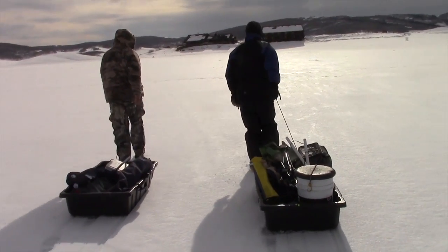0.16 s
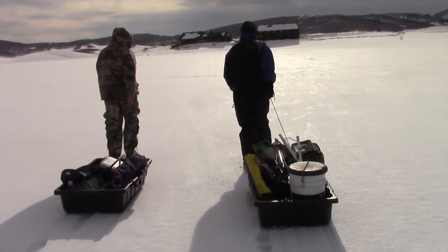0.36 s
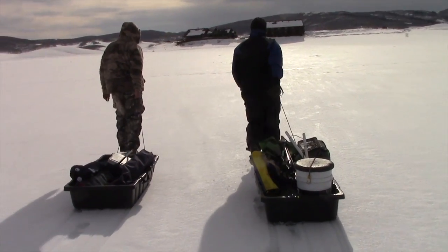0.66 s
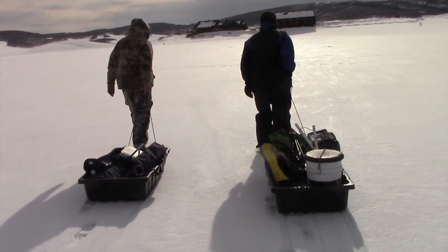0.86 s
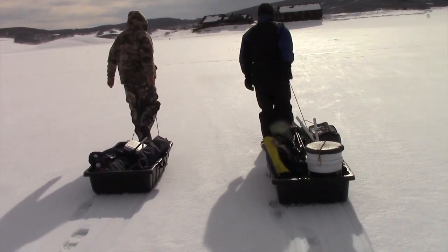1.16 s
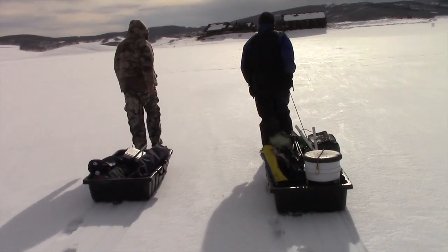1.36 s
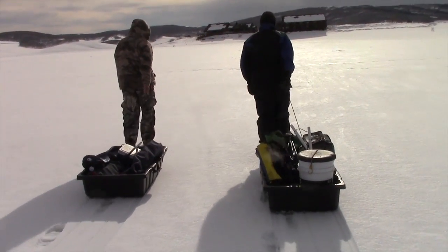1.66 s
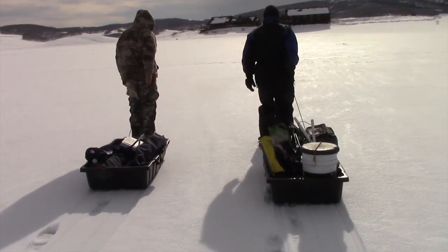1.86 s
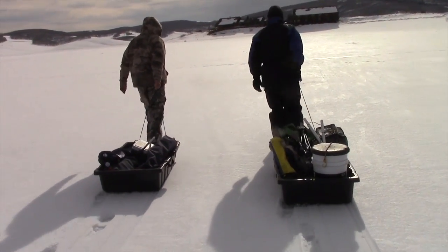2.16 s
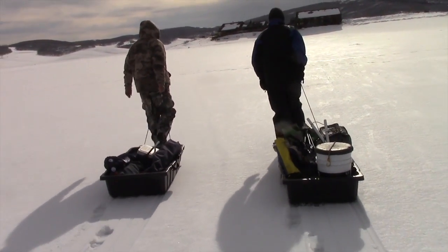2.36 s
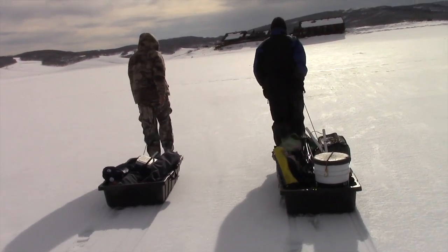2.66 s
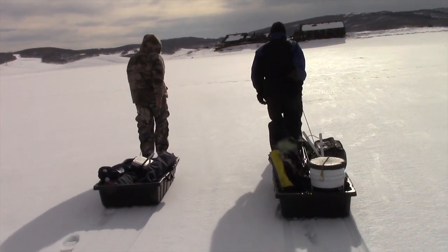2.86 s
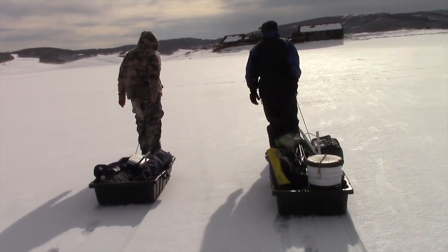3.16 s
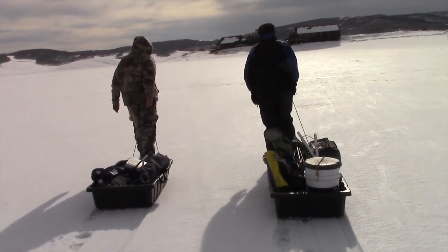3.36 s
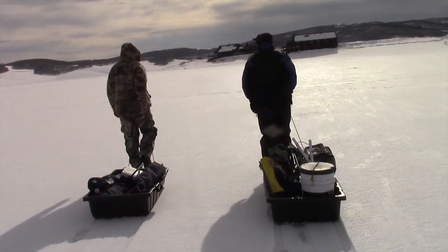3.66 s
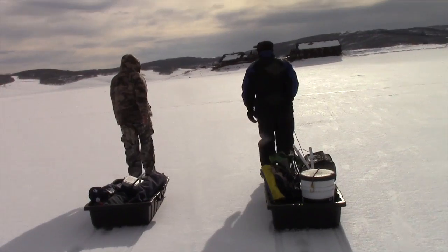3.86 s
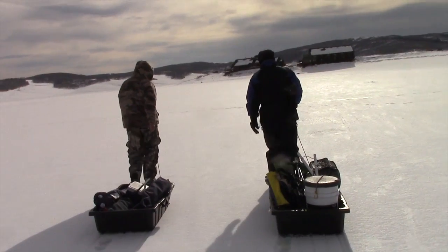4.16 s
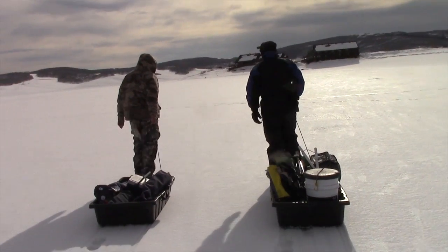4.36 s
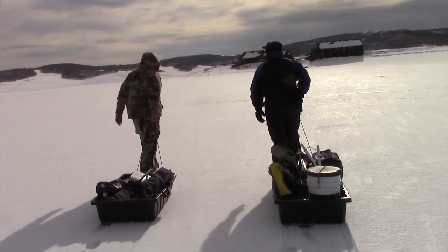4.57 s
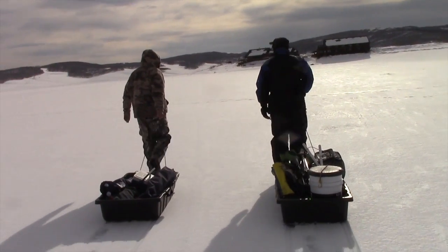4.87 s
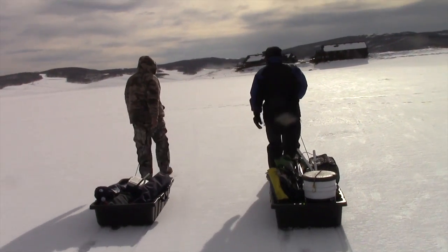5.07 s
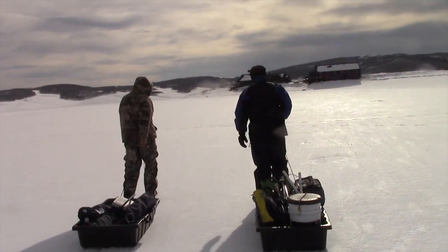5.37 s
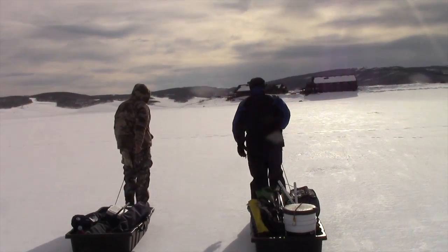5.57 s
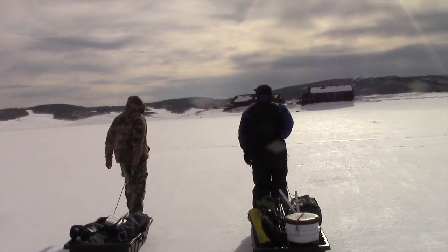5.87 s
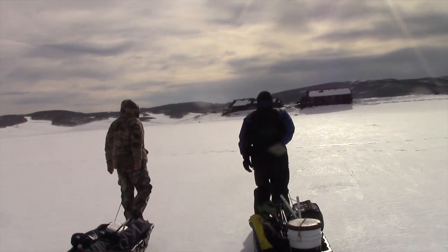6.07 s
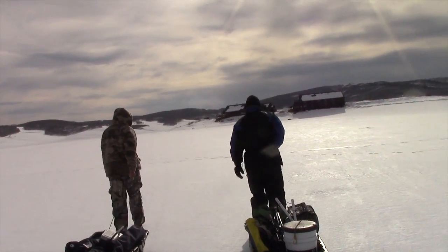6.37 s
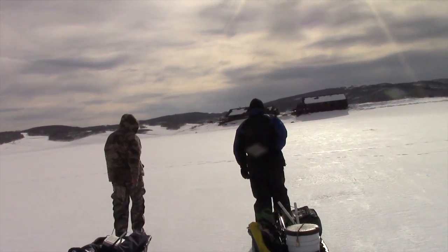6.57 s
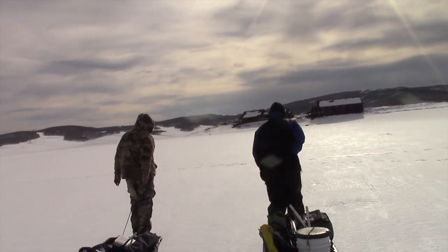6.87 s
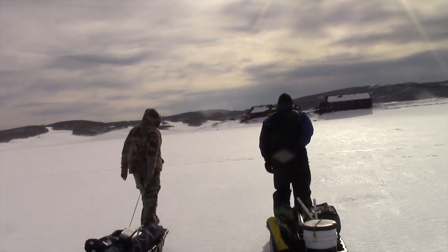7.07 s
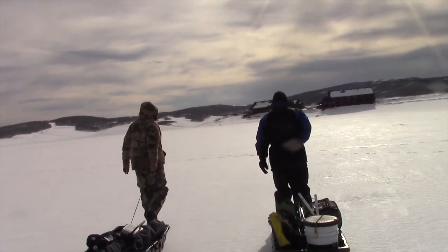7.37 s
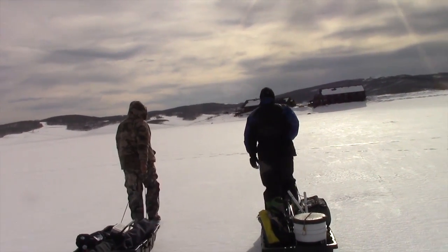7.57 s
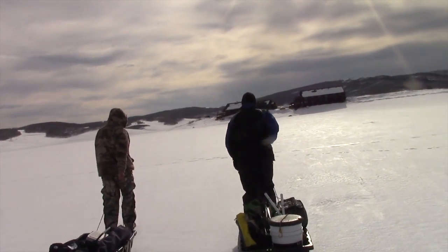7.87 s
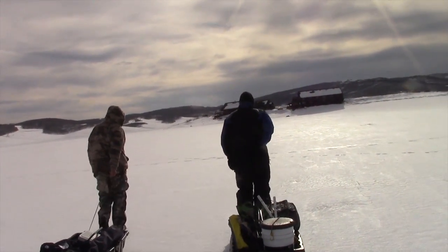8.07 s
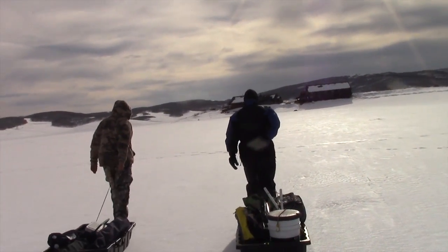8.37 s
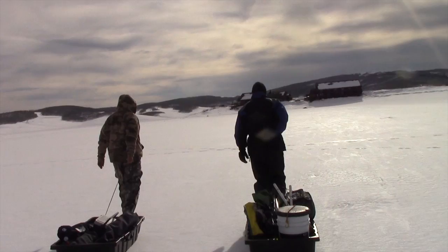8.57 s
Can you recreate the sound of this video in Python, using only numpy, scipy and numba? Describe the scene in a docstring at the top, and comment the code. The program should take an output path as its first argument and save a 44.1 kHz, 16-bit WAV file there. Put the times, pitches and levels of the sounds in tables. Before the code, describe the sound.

A grainy, flickering sled-on-snow hiss grows stronger after four seconds, with muffled crust pops underfoot and faint hollow plastic scuffs later.

```python
"""A hiss runs throughout, stronger from about four seconds: two loaded plastic sleds slide over dry snow on a
frozen lake, a few metres ahead of a walking microphone. It is coloured noise for countless rubbing crystals,
flickering range by range. Under boots the crust gives way in dull, short pops from the start, which are brief
pressure swings with smaller crumbling around them. Later a hull scuffs over ridges: resonant noise in short
bursts. A gain control ducks after the loudest pops."""
import sys
import numpy as np
from scipy import signal
from scipy.fft import rfft, irfft, next_fast_len
from scipy.io import wavfile
from scipy.ndimage import uniform_filter1d
from numba import njit

SR = 44100
rng = np.random.default_rng(int(sys.argv[2]) if len(sys.argv) > 2 else 0)


def transcribe(u):
    """Save the signal u as a 16-bit wav file named by the first command-line argument.

    u: samples, shape (n,) or (channels, n), limited to [-1, 1]; the rate is SR.
    q: integer samples, one column per channel.
    """
    v = np.clip(np.atleast_2d(u).T, -1, 1)
    q = np.round(v * 32767).astype(np.int16)
    wavfile.write(sys.argv[1], SR, q)


N = 384552


def undb(db):
    """Amplitude ratio of a level in dB."""
    return 10 ** (np.asarray(db) / 20)


def curve(table):
    """Straight lines between the rows of (seconds, value), one value per sample."""
    s, value = np.transpose(table)
    return np.interp(np.arange(N) / SR, s, value)


def walk(rate_hz):
    """Random levels held for 1 / rate_hz seconds and slewed twice; spread near 1."""
    hold = int(SR / rate_hz)
    steps = np.repeat(rng.standard_normal(N // hold + 1), hold)
    slewed = uniform_filter1d(uniform_filter1d(steps, hold), hold)
    return 1.3 * slewed[:N]


def coloured(gain):
    """Noise whose spectrum is gain(Hz)."""
    size = next_fast_len(N)
    hz = np.maximum(np.fft.rfftfreq(size, 1 / SR), 1)
    return irfft(rfft(rng.standard_normal(size)) * gain(hz), size)[:N]


def snow_hiss():
    """Crystals rub under the hulls: noise in overlapping octave ranges, each flickering with the patchy snow."""
    # Hiss of the sliding sleds. Each row: time in seconds, level in dB before the gain control.
    slide_level = [(0.0, -29), (0.25, -30), (0.4, -32), (0.8, -30), (1.6, -31), (2.4, -30.5), (2.7, -30.5),
                   (2.9, -32.5), (3.25, -30), (3.6, -30.5), (4.05, -30.5), (4.25, -26), (5.05, -27),
                   (6.7, -27.5), (7.8, -27), (7.93, -28.8), (8.4, -27.5), (8.72, -31)]
    # Tone of the rubbing crystals. Each row: frequency in Hz, relative level in dB per Hz.
    hiss_tone = [(30, -21), (165, -21.5), (295, -13), (740, -11), (1250, -7.5), (1500, -4.5), (2300, -1),
                 (2680, -2.5), (3150, -2), (4400, -6), (5650, -4.5), (7900, -6), (10800, -14),
                 (12800, -22.5), (14600, -20), (16000, -27)]
    # Fullness of the scrape below about 1.4 kHz. Each row: time in seconds, dB against its usual share.
    low_share = [(0, -0.5), (4, -1), (5, 0.2), (7.5, .6), (8.4, 3.5), (8.72, -0.5)]

    tone_hz, tone_db = np.transpose(hiss_tone)
    hiss, patchy = 0, walk(18)
    for octave in range(-1, 5):  # range centres in octaves from 1 kHz; the end ranges stay open

        def range_gain(hz):
            distance = np.clip(np.log2(hz / 1000), -1, 4) - octave
            crossfade = np.cos(np.pi / 2 * np.clip(distance, -1, 1))
            return undb(np.interp(np.log(hz), np.log(tone_hz), tone_db)) * crossfade

        band = coloured(range_gain)
        flicker_db = 0.26 * patchy + 0.48 * walk(12) + 0.53 * walk(28)  # patchy is common to all ranges
        share_db = (octave < 1) * curve(low_share)
        hiss = hiss + band * undb(share_db + flicker_db)
    sides = np.array([[1], [-1]])  # opposite signs left and right
    return (hiss / np.std(hiss) + treble_patches() * sides) * undb(curve(slide_level))


def treble_patches(size=2048, count=260):
    """Brief bands of treble noise at random moments spread out to the sides; most are faint and narrow."""
    out, hz = np.zeros(N + size), np.fft.rfftfreq(size, 1 / SR)
    for at, height, strength in rng.random((count, 3)):
        centre_hz = 4500 + 10000 * height ** 1.155
        half_width_hz = 200 + 600 * strength ** 3
        in_band = np.abs(hz - centre_hz) < half_width_hz
        patch = irfft(rfft(rng.standard_normal(size)) * in_band)
        gain = undb(-24 + 30 * strength ** 3 - 14 * height ** 2)
        start = int(at * N)
        out[start:start + size] += gain * np.hanning(size) * patch
    return out[:N]


def pops(s, peak_db, hz, turns, half=384):
    """Each pop is a pressure swing of about one or two turns, rising as fast as it dies."""
    out, t = np.zeros(N + 3 * half), np.arange(-half, half) / SR
    phases = rng.uniform(0, 2 * np.pi, len(s))
    for at, db, f, phase in zip(s, peak_db, hz, phases):
        start = int(max(at, 0) * SR)
        swell = np.exp(-(2 * t * f / turns) ** 2)
        out[start:start + 2 * half] += undb(db) * swell * np.cos(2 * np.pi * f * t + phase)
    return out[half:N + half]


def around(s, db, before_s, after_s):
    """Envelope that swells towards each moment and fades after it; powers add."""
    marks = np.zeros(N)
    np.add.at(marks, (s * SR).astype(int), undb(2 * db))  # doubled dB gives power

    def fade(power, tau):
        return signal.lfilter([1], [1, -np.exp(-2 / (tau * SR))], power)

    after, before = fade(marks, after_s), fade(marks[::-1], before_s)[::-1]
    return np.sqrt(after + before - marks)  # each mark was counted twice


def boots(count=4):
    """Crust breaks in pops, each with a sharper snap and a few splinters; fainter grains crumble at random."""
    # Crust giving way under boots. Each row: time in seconds, envelope peak in dB before the gain control,
    # pitch in Hz, snap in dB against that peak.
    crust_pops = [(0.027, -21.5, 405, -13), (0.099, -33, 320, -22), (0.144, -31, 620, -1),
                  (0.207, -29, 270, -22), (0.222, -17, 266, -15), (0.2291, -22.5, 330, -12),
                  (0.236, -14, 460, -5), (0.246, -23, 410, -18), (0.339, -31.5, 238, -20),
                  (0.511, -38, 190, -20), (0.692, -33, 290, -22), (0.791, -27, 306, -22),
                  (0.851, -29, 440, 2), (0.874, -36, 330, -22), (0.918, -29.5, 510, -3),
                  (0.952, -39, 230, -20), (1.015, -45, 200, -20), (1.145, -27, 310, -24),
                  (1.262, -35, 220, -20), (1.296, -35, 260, -20), (1.326, -25.5, 360, -27),
                  (1.366, -31, 380, -26), (1.433, -14, 344, -12), (1.444, -29, 230, -14),
                  (1.484, -34, 250, -19), (1.546, -33, 280, -20), (1.577, -27, 353, -14),
                  (1.625, -31, 256, -15), (1.788, -25, 233, -6), (1.793, -20, 410, -25),
                  (1.816, -26, 460, -8), (1.869, -26.5, 247, -1), (2.083, -31, 300, -20),
                  (2.089, -16, 305, -22), (2.095, -21, 358, -22), (2.103, -30, 300, -20),
                  (2.33, -26.5, 253, -5), (2.397, -32, 330, -20), (2.413, -28, 330, -24),
                  (2.448, -35, 230, -26), (2.718, -35, 270, -20), (2.776, -20, 338, 6),
                  (2.78, -12, 350, -5.5), (2.7842, -19, 300, -25), (2.816, -37, 320, -25),
                  (2.913, -35, 240, -20), (2.963, -29, 280, -11), (2.971, -23, 310, -24),
                  (3.026, -19.5, 324, -10), (3.06, -31, 330, -20), (3.124, -35, 260, -20),
                  (3.186, -35, 280, -20), (3.273, -24.5, 350, -10), (3.524, -25.5, 322, -17),
                  (3.58, -43, 250, -20), (3.79, -40, 200, -20), (3.824, -21, 380, -5),
                  (3.832, -22, 248, -18), (3.841, -28.5, 380, -5), (4.028, -44, 250, -20),
                  (4.205, -33, 280, -20), (4.241, -28, 370, -20), (4.301, -24, 530, -16),
                  (4.308, -15, 278, -16), (4.324, -26, 255, -25), (4.51, -22, 316, -5),
                  (4.827, -22.5, 308, 0), (4.875, -31, 300, -26), (4.908, -24, 380, -20),
                  (4.999, -25.5, 700, -1), (5.08, -28, 270, -6), (5.235, -22.5, 222, -3),
                  (5.619, -26, 281, -5), (5.629, -28, 360, -20), (5.687, -33, 240, -18),
                  (5.827, -30, 640, -39), (5.876, -30, 530, -18), (5.884, -32, 230, -10),
                  (5.91, -27.5, 330, -25), (5.934, -31, 240, -26), (6.328, -23.5, 342, 2),
                  (6.514, -31, 340, 2), (6.814, -31, 287, 1), (7.085, -27, 302, -2), (7.123, -29, 310, -31),
                  (7.196, -22.5, 446, -22), (7.205, -22.5, 262, -22), (7.611, -27, 370, -8),
                  (7.679, -27, 450, 2), (7.781, -29, 457, 1), (7.794, -29, 330, -22),
                  (7.814, -29.5, 380, 8), (7.918, -33, 370, -17), (7.957, -28.5, 410, -5),
                  (8.044, -35, 480, -2), (8.178, -26, 300, -7), (8.187, -28, 240, -25),
                  (8.196, -22, 340, -44), (8.21, -23, 300, -24), (8.215, -14.5, 332, -26),
                  (8.227, -33, 220, -22), (8.24, -25, 260, -7), (8.25, -22, 250, -22),
                  (8.257, -13.5, 448, -17), (8.27, -20, 225, -16), (8.286, -29, 300, -15),
                  (8.299, -28, 200, -22), (8.369, -31, 400, 2), (8.376, -31, 460, -3),
                  (8.411, -32, 360, -22), (8.498, -26, 590, -12), (8.506, -31, 460, -4)]
    # level around a full-scale pop, dB per dB of pop, level between steps
    crumble_db, crumble_follows, crumble_floor_db = -36, 0.48, -66.5
    build_up_s, die_away_s = 0.027, 0.04

    s, peak_db, hz, snap_db = np.transpose(crust_pops)
    snap = pops(s, peak_db + snap_db, 600 + 250 * rng.random(len(s)), turns=1.15)

    when, size, pitch = rng.standard_normal((len(s), count, 3)).T
    splinter_s = s + 0.00594 * when
    splinter_db = peak_db - 17.0 + 2.1 * np.clip(size, -2, 2)
    splinter_hz = 330 * 1.5 ** pitch
    splinters = pops(splinter_s.ravel(), splinter_db.ravel(), splinter_hz.ravel(), turns=2.1)

    moment, luck, height = rng.random((2500, 3)).T
    grain_db = np.minimum(-3.5 * np.log(1 - luck), 12.)  # relative: few grains are large
    crumble = pops(moment * N / SR, grain_db, 120 * 4.7 ** height, turns=1.07)
    near_pops = around(s, crumble_db + crumble_follows * peak_db, build_up_s, die_away_s)
    crumbling = undb(crumble_floor_db) + near_pops

    return pops(s, peak_db, hz, turns=1.2) + snap + splinters + crumble / np.std(crumble) * crumbling


def hull_scuffs():
    """A hollow hull scuffs over ridges: noise gathered round its resonance, in short bursts."""
    # Scuffs over ridges. Each row: start in seconds, length in seconds, level in dB before the gain control.
    ridge_scuffs = [(5.488, .14, -41), (5.86, 0.13, -49), (7.57, 0.13, -43.5), (7.77, 0.075, -41),
                    (7.9, .16, -48)]
    hull_hz, width_hz, edge_s = 435, 105, 0.022  # width at half amplitude; edge is the ramp time
    hull = coloured(lambda hz: 1 / (1 + (2 * (hz - hull_hz) / width_hz) ** 2))
    t, level = np.arange(N) / SR, 0
    for s, length, db in ridge_scuffs:
        inside_s = np.minimum(t - s, s + length - t)
        level = level + undb(db) * np.clip(inside_s / edge_s + .5, 0, 1)
    return hull / np.std(hull) * level


def scene():
    """Sleds ahead and boots on the crust, summed in stereo."""
    return snow_hiss() + boots() + hull_scuffs()


@njit
def follow(x, attack, release):
    """Envelope that rises fast and falls slowly."""
    y, e = np.empty(len(x)), 0.
    for i in range(len(x)):
        e += (abs(x[i]) - e) * (attack if abs(x[i]) > e else release)
        y[i] = e
    return y


def record(dry):
    """Microphone chain: wind filter under the bass, gain control that ducks after peaks, steep treble limit."""
    attack_s, release_s, threshold_db, top_hz = 0.0011, 0.2, -17.5, 15700
    x = signal.sosfilt(signal.butter(2, 120., "high", fs=SR, output="sos"), dry)
    env = follow(x.mean(axis=0), 1 / (attack_s * SR), 1 / (release_s * SR))
    x = x * np.minimum(1, undb(threshold_db) / (env + 1e-9)) ** 0.19  # dB down per dB over
    return signal.sosfilt(signal.ellip(12, .2, 80, top_hz, fs=SR, output="sos"), x)


dry = scene()
out = record(dry)
transcribe(out)
```